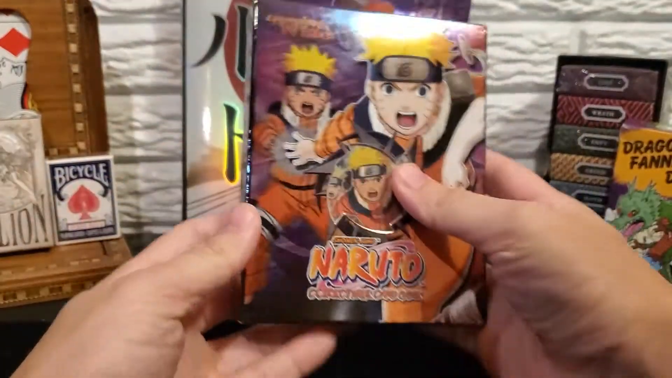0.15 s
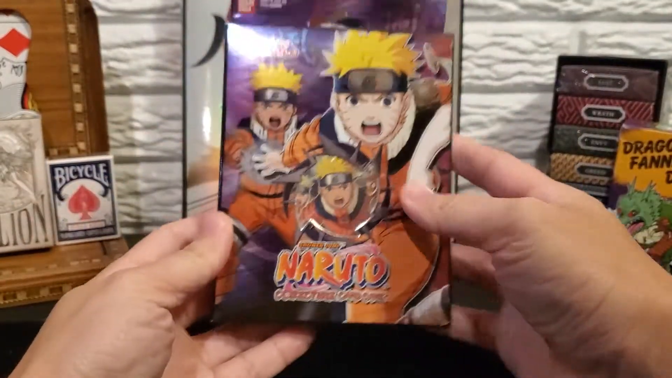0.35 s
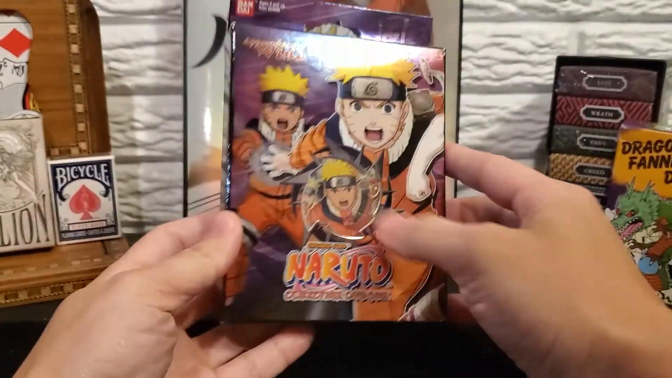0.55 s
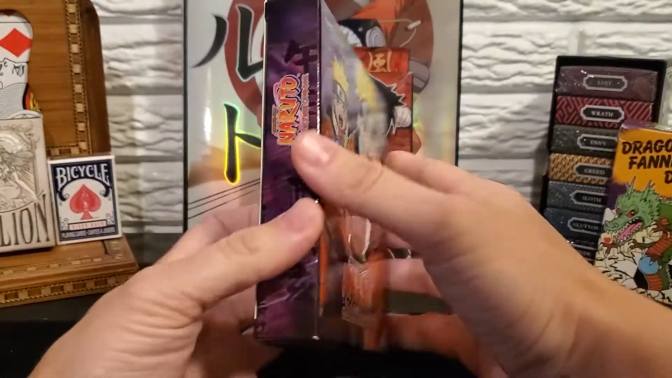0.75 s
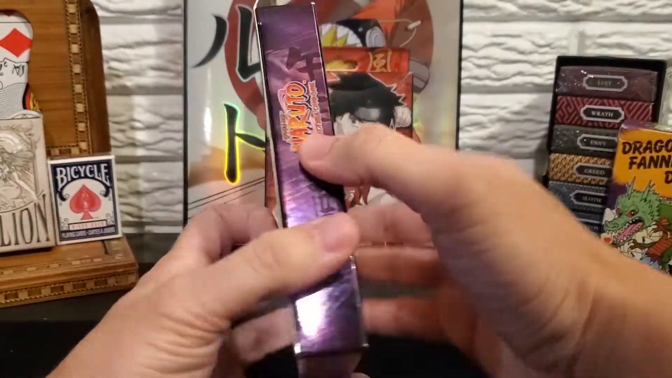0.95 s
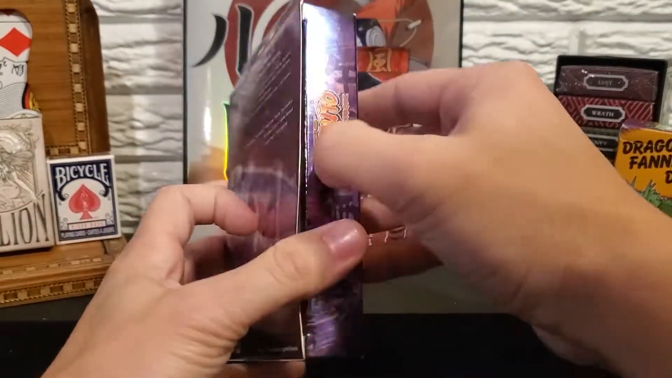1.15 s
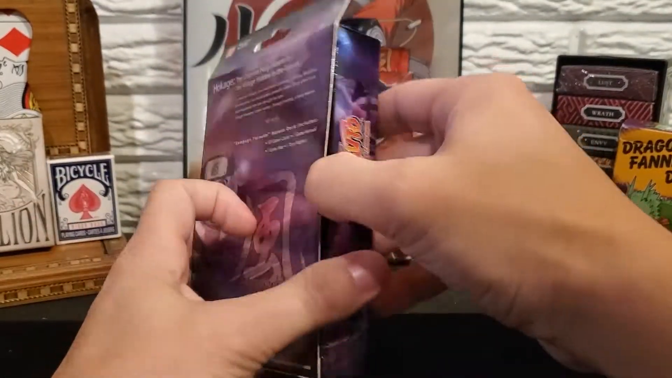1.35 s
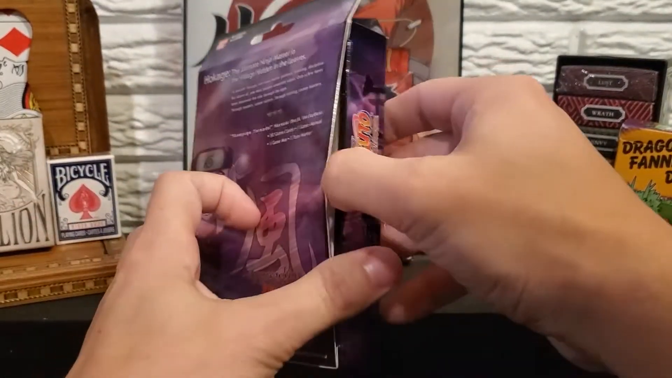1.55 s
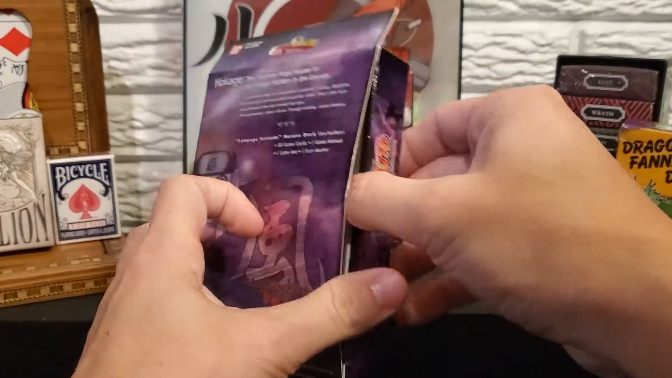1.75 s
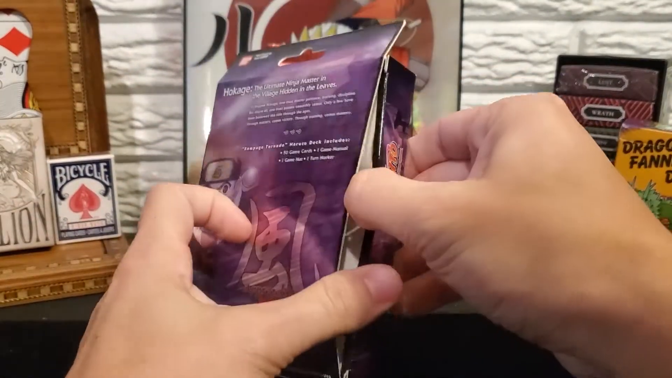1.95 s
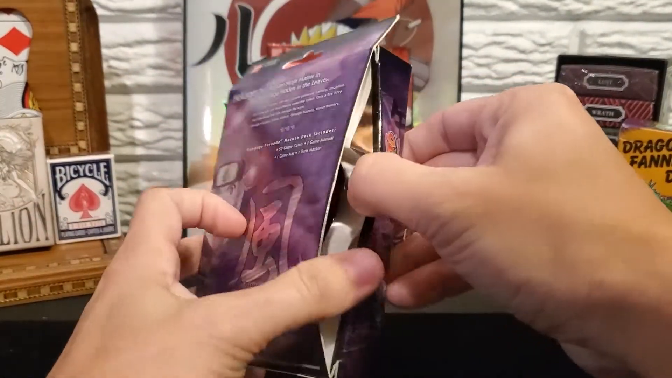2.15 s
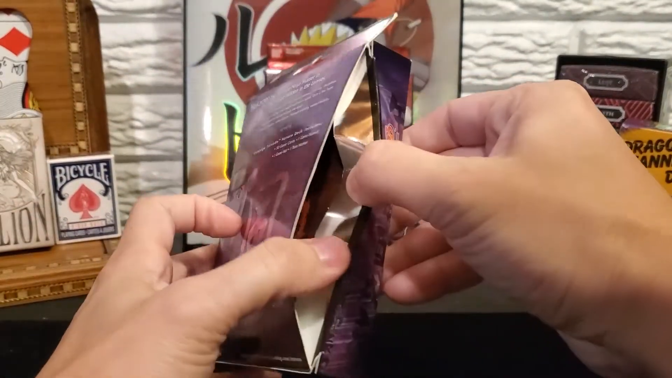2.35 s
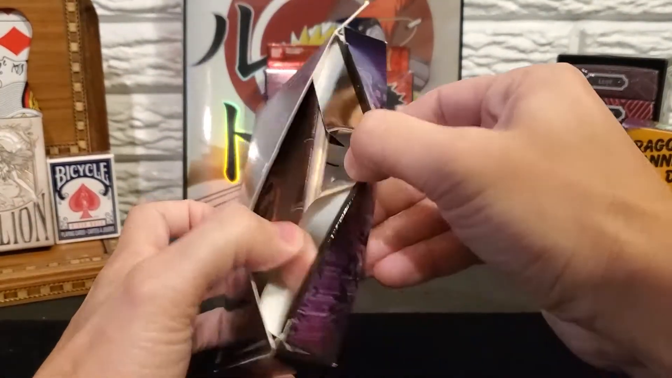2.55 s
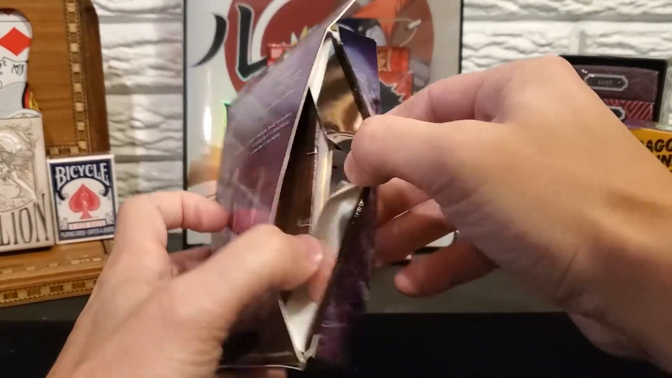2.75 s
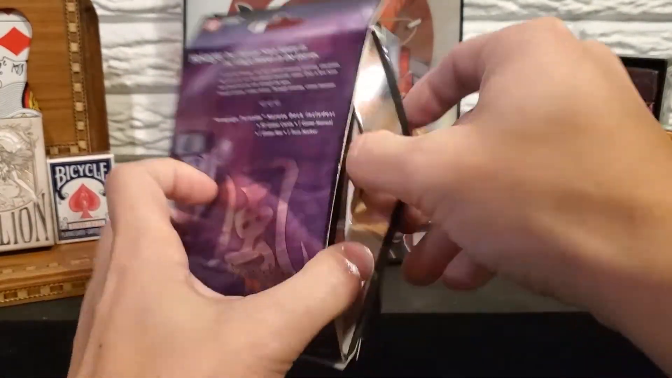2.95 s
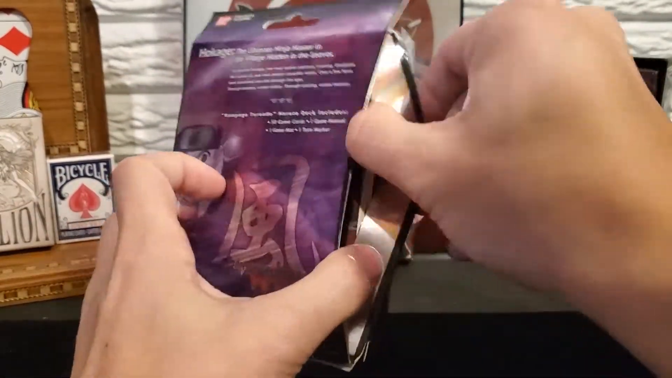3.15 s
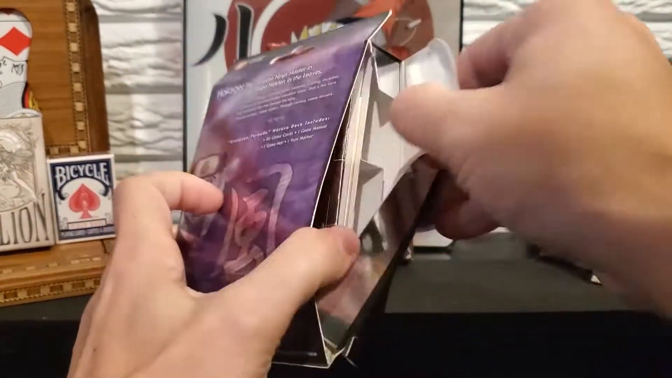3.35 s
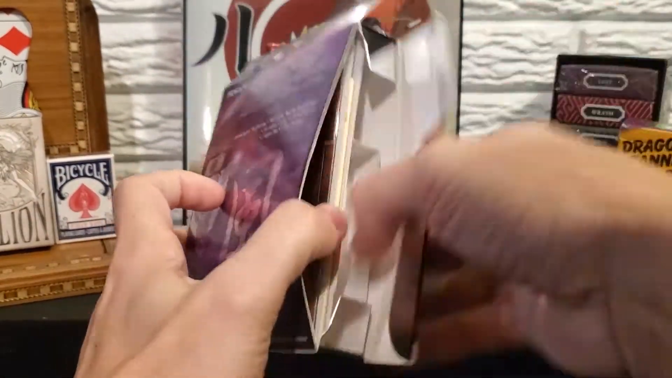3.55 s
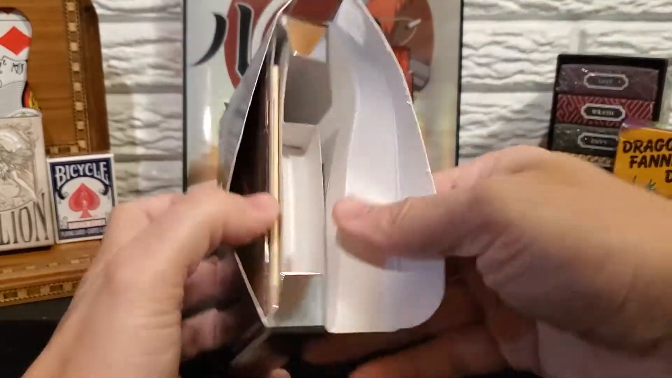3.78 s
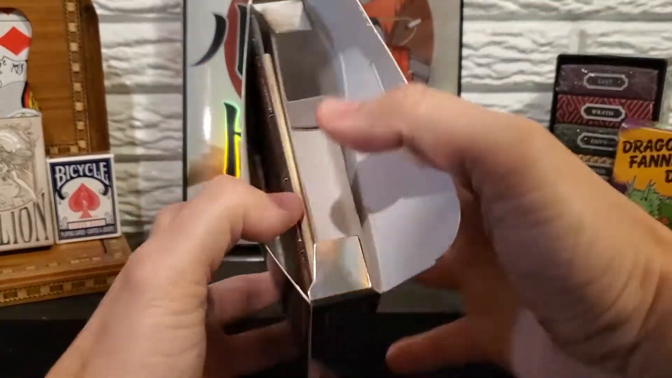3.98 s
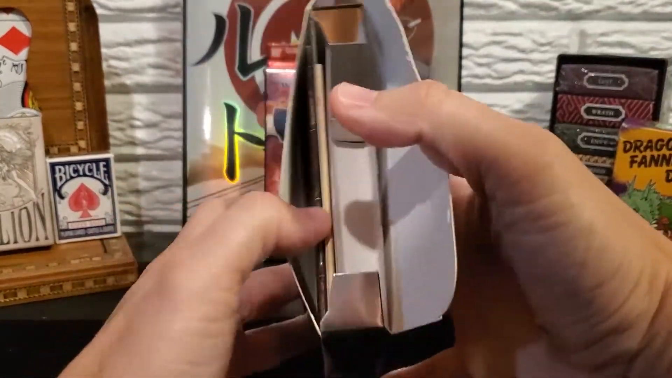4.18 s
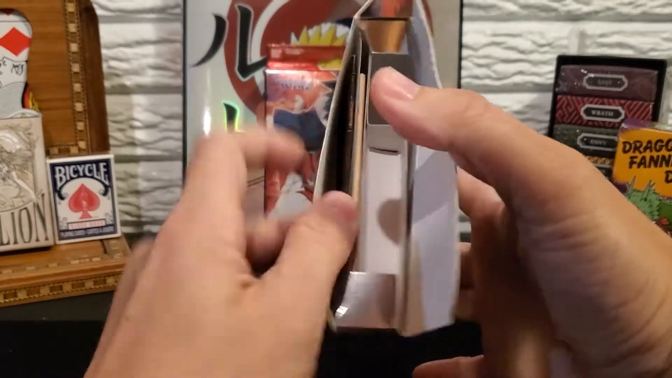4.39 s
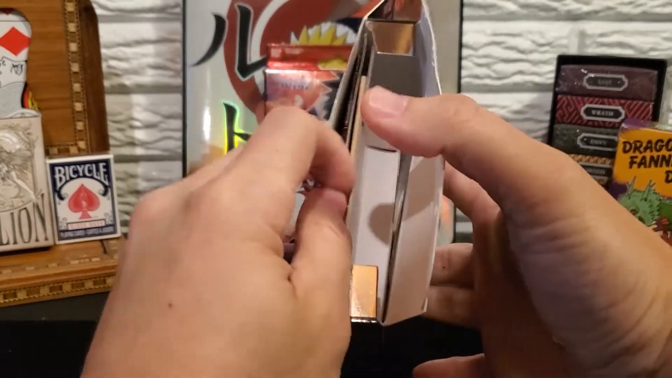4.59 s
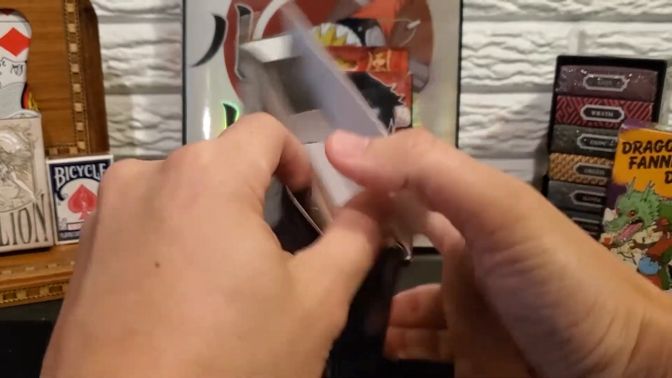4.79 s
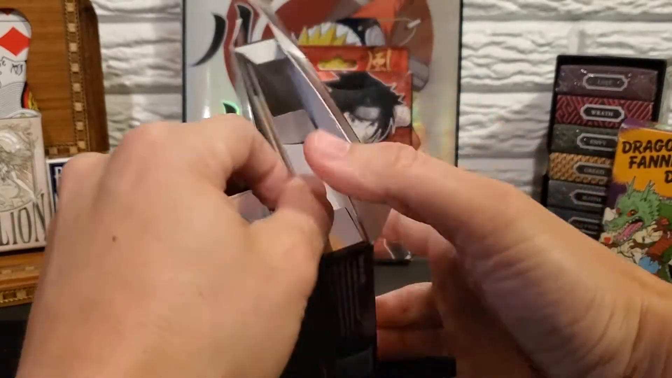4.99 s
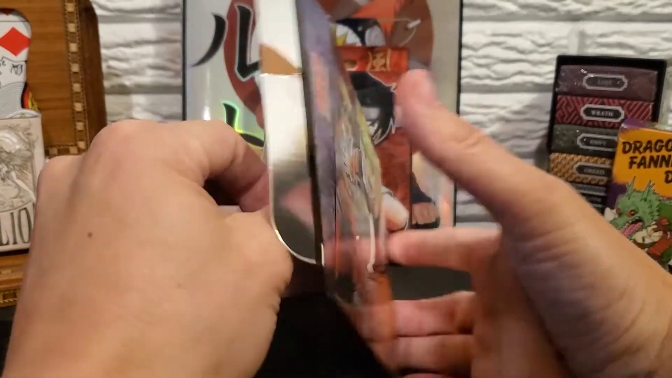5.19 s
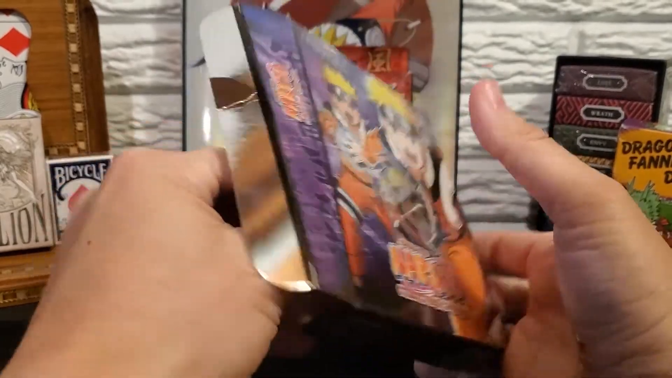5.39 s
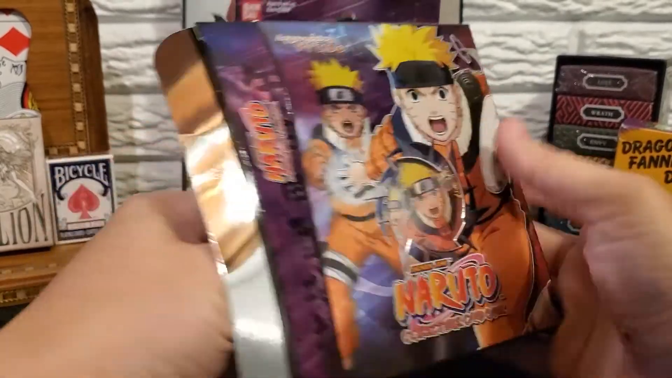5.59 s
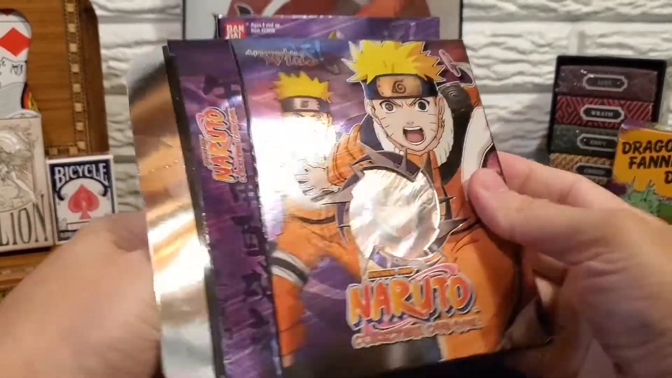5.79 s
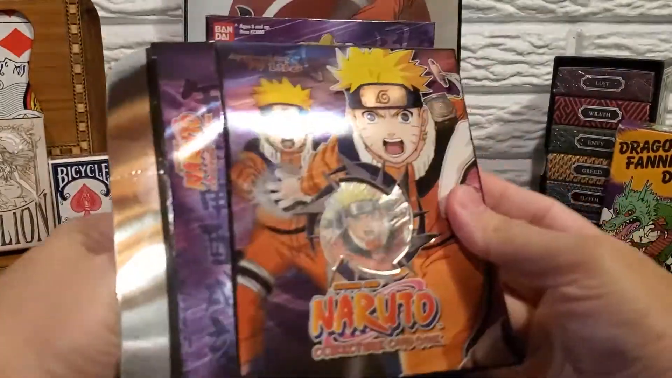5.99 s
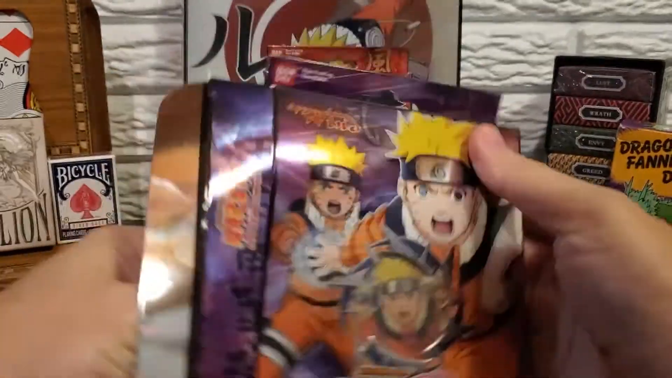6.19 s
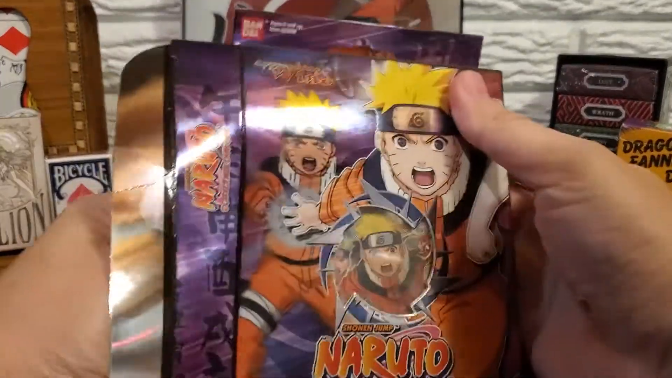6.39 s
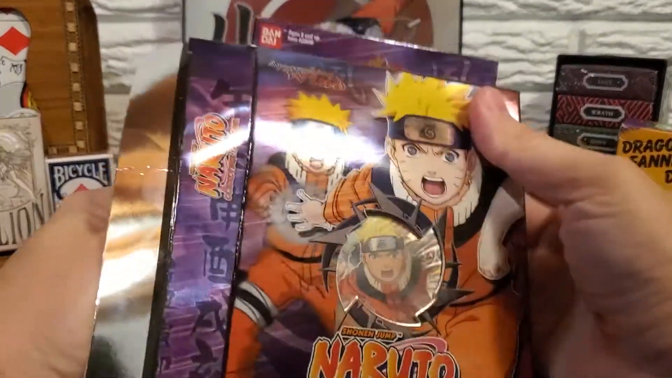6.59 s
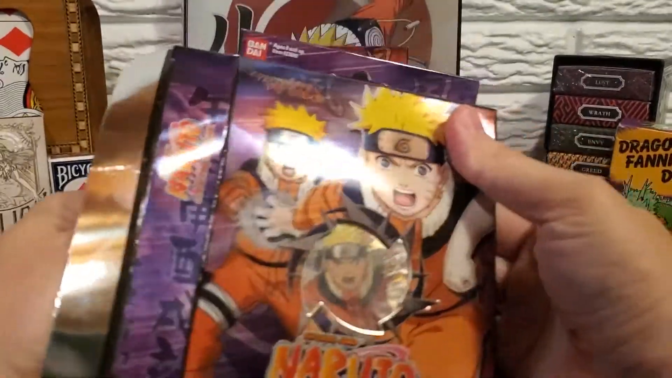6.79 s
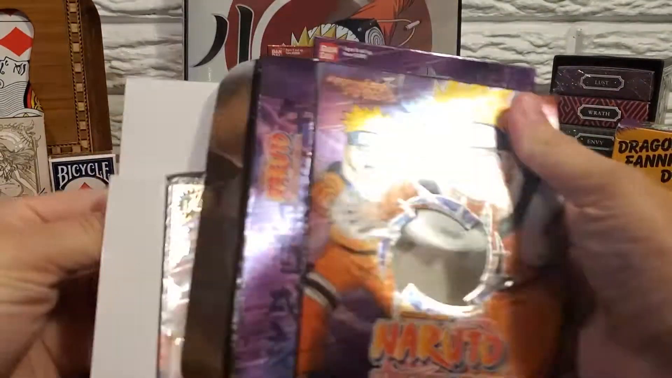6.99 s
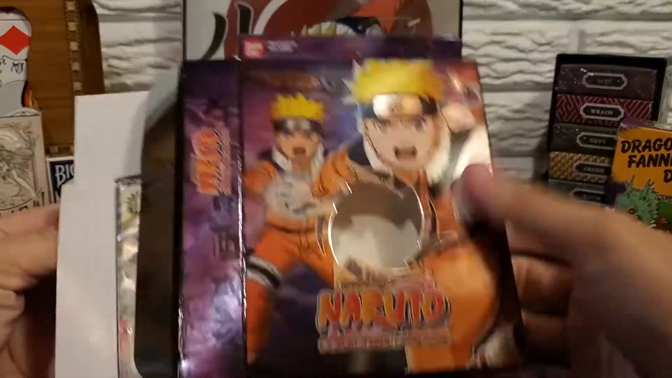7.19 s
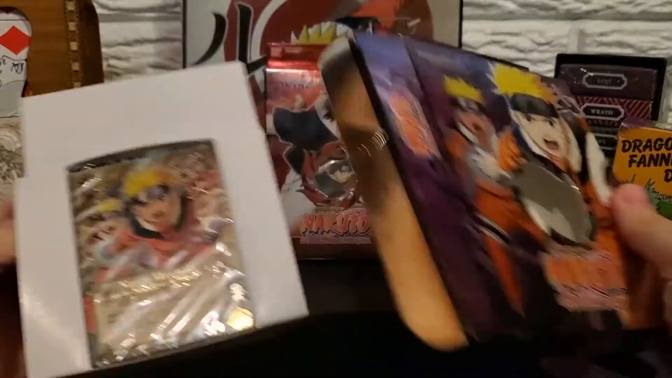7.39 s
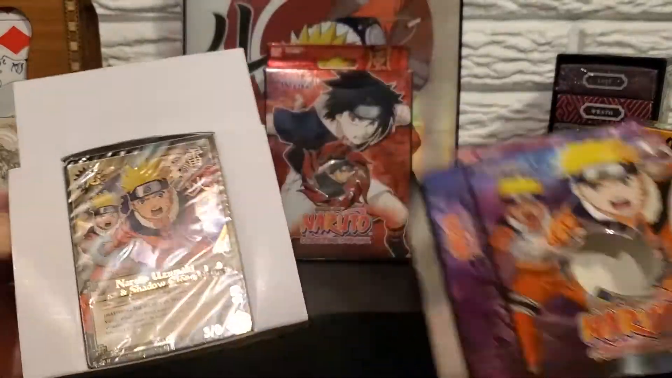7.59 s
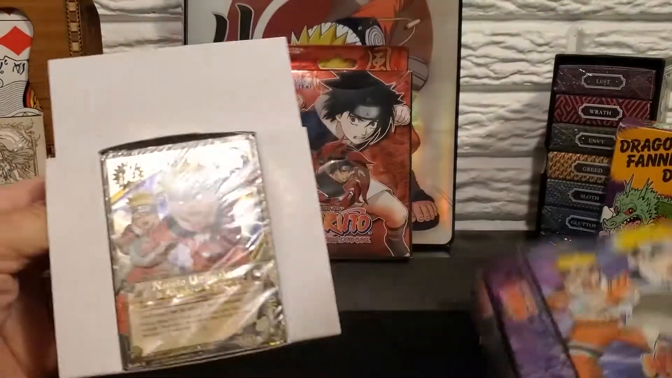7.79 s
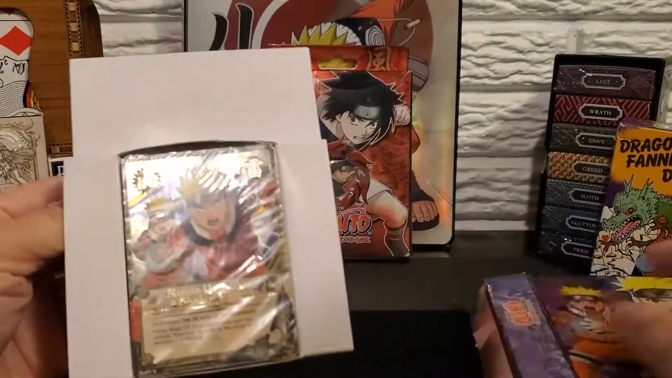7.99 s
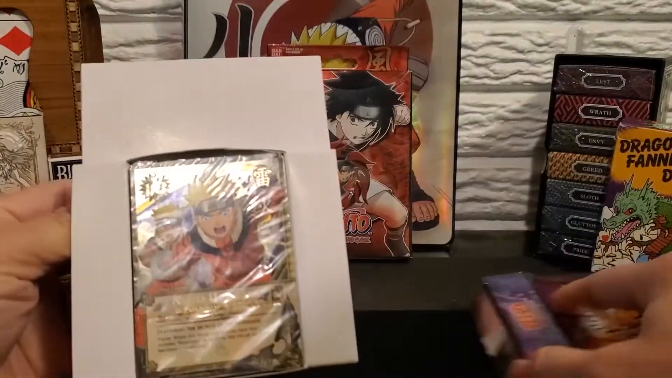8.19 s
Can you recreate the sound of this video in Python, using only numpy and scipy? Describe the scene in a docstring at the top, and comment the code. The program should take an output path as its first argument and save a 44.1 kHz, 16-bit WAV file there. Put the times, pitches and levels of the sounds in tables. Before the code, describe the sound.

Close, dry cardboard handling in a small room: faint rubbing, a burst of loud hollow snaps, lighter fumbling, then a slide and firm knocks.

```python
"""Sharp snaps and hollow knocks, close to a stereo microphone: hands turn a thin glossy card box,
pop its flaps open and slide a tray out. Each snap is a short ragged contact that rings the box modes.
Between them fingers and card edges rub: stick-slip noise rings the card or hisses on the gloss.
A small room answers the box; behind it lie a low rumble, a wavering hum and a dull hush."""
import sys
import numpy as np
from scipy import signal
from scipy.fft import rfft, irfft, next_fast_len
from scipy.io import wavfile
from scipy.ndimage import uniform_filter1d

SR = 44100
rng = np.random.default_rng(int(sys.argv[2]) if len(sys.argv) > 2 else 0)


def pcm_store(signal):
    """Save signal as 16-bit PCM."""
    levels = np.round(np.clip(np.atleast_2d(signal), -1, 1) * 32767)
    wavfile.write(sys.argv[1], SR, levels.astype(np.int16).T)


N = 363384   # length [samples]

# Cavity and panel modes of the box: (frequency [Hz], width before damping [Hz], relative level [dB])
BOX_MODES = [(191, 70, -10), (340, 150, -2), (412, 110, 0), (613, 59, -7.5), (733.7, 50, -2.5),
             (815.5, 51, -0.5), (957, 99, -6.5), (1123, 100, -4), (1420, 150, 6), (1650, 170, 4),
             (1930, 130, 0.5), (2100, 140, 2.5), (2348, 340, 1), (2684, 430, 0), (2970, 480, -2),
             (3490, 310, -2)]
# Colour of dry cracks and of friction on the glossy card: (frequency [Hz], relative density [dB per Hz])
GLOSS_COLOUR = [(1470, -31), (2500, -1.5), (3540, -8), (3850, -12.5), (5530, -16.5), (6600, -18.5),
                (7700, -23.5), (9280, -18.5), (15800, -16.5)]


def snaps():
    """A short ragged contact rings the box from body thump to panel knock, with a dry crack on top."""
    # Flaps and tabs: (time [s], body thump [dB], hollow thud [dB], panel knock [dB], crack [dB],
    # knock pitch [Hz], contact decay [ms])
    snap_rows = [(0.179, -54, -67, -43.5, -59, 1530, 1.6), (0.184, -65, -63, -49, -77, 3400, 4.5),
                 (1.817, -73, -34.5, -44.5, -70, 1480, 7.4), (1.839, -77, -39, -41.5, -59, 1430, 3.8),
                 (2.541, -57, -33, -31, -63, 1600, 3.4), (2.561, -56, -31.5, -43, -64, 1330, 1),
                 (2.775, -72, -50, -45, -58, 1900, 1.9), (2.868, -68, -59, -52, -62, 1500, 1.4),
                 (2.984, -51.5, -59, -41.5, -49.5, 1980, 3.4),
                 (3.157, -44.5, -27.5, -33.5, -28.5, 2150, 1.96),
                 (3.248, -66, -20.5, -14.5, -16, 2480, 1.9), (3.257, -32.5, -27.5, -30, -28, 2440, 1.9),
                 (3.387, -19, -20, -12, -22.5, 2500, 1.15), (3.397, -42, -44, -31, -42, 2930, 1.3),
                 (3.444, -38, -43, -45.5, -37, 2220, 1.3), (3.656, -66, -55, -57, -36.5, 2920, 3.7),
                 (3.671, -56, -51, -36, -42, 2110, 1.4), (3.6, -74, -65, -57, -56, 2180, 1.3),
                 (3.812, -77, -85, -64.5, -60, 3020, 1.7), (3.859, -80, -80.5, -65.5, -62, 2490, 0.72),
                 (3.802, -85, -85, -71, -48, 3020, 1.65), (4.332, -62, -37, -33.5, -36.5, 3320, 5.6),
                 (4.608, -73.5, -70.5, -59.5, -67, 2170, 2.9), (4.616, -70, -60, -49.5, -69.5, 1880, 2.4),
                 (4.641, -73, -51, -53.5, -71, 1490, 3.5), (4.661, -72, -61, -64, -74, 1500, 3),
                 (4.69, -64, -56, -44.5, -56.5, 2270, 1.7), (4.726, -63, -55, -38, -52, 2150, 4),
                 (4.756, -52, -47, -55, -54, 2700, 3.6), (4.734, -47, -47, -32.5, -43.5, 2360, 1.9),
                 (5.023, -60, -74, -37, -61, 3240, 5.2), (5.245, -55, -41, -40.5, -96.5, 1260, 1.48),
                 (5.261, -42, -29, -41, -85, 1210, 1.9), (6.093, -76.5, -56.5, -73, -75, 1540, 1.9),
                 (6.173, -59, -49, -45.5, -46.5, 1520, 3.2), (6.232, -65, -39.5, -55, -46, 1600, 2.2),
                 (6.252, -41.5, -29, -40, -35, 1640, 1.67), (6.867, -28, -34, -44.5, -41, 1523, 1.4),
                 (6.888, -33.5, -34, -32.5, -36, 1600, 5.7), (6.97, -78, -75, -63, -49, 3040, 0.81),
                 (7.075, -61, -51.5, -47.5, -58, 1780, 3.4), (7.188, -78.5, -71.5, -67, -66, 2210, 0.89),
                 (7.314, -45, -29.5, -32.5, -42, 1380, 4.1), (7.349, -54.5, -17.5, -15, -21, 1674, 2.1),
                 (7.853, -39.5, -39.5, -32, -45, 1547, 5.5), (7.87, -27, -32, -32, -43.5, 1730, 0.64),
                 (7.885, -36.5, -24.5, -29, -37.5, 1640, 2), (7.693, -74, -69, -65, -69.5, 1620, 1.9),
                 (8.123, -63.5, -52.5, -67, -75, 1560, 1.37)]
    push = 0.46   # steady shove under the ragged contact, relative to its rattle
    evenness = 0.45   # 0 = ragged contact colours the snap, 1 = it drives all pitches alike
    size = 4096   # samples per snap
    out = np.zeros((2, N + size))
    t = np.arange(size) / SR
    fade_out = np.clip((0.085 - t) / 0.02, 0, 1)
    for s, thump_db, thud_db, knock_db, crack_db, knock_hz, contact_ms in snap_rows:
        time = t * 1000 / np.clip(contact_ms, 0.2, 20)   # in contact decays
        envelope = np.minimum(time / 0.76, 1) ** 0.99 * np.exp(-time)
        contact = (rng.standard_normal((2, size)) + [[push], [0]]) * envelope
        lines = rfft(contact)
        contact = irfft(lines / np.abs(lines) ** evenness, size)
        uneven_db = 2.2 * rng.standard_normal(len(BOX_MODES))
        parts = [(thump_db, box_modes(0, 500, uneven_db, damping=1.0)),
                 (thud_db, box_modes(500, 1100, uneven_db, damping=1.0)),
                 (knock_db, panel_knock(knock_db, knock_hz, uneven_db)),
                 (crack_db, crack)]
        start = round(s * SR)
        for db, gain in parts:
            sound = coloured(contact, gain) * fade_out
            power = uniform_filter1d(sound.mean(axis=0) ** 2, size=SR // 300)
            loudest = np.sqrt(power.max())   # rms of the loudest moment
            out[:, start:start + size] += amp(db) * sound / loudest
    return out[:, :N]


def box_modes(low_hz, high_hz, strength_db, damping):
    """Response of the box modes in a range, each with its strength for this touch."""
    dull_hz = 5000   # card is soft: thump, thud and knock carry little treble

    def gain(f):
        total = 0
        for k, ((hz, width, db), more_db) in enumerate(zip(BOX_MODES, strength_db)):
            if low_hz <= hz < high_hz:
                total = total + amp(db + more_db) * (-1) ** k * mode(f, hz, width * damping)
        return (1 + 1j * f / dull_hz) ** -2 * total
    return gain


def panel_knock(knock_db, knock_hz, uneven_db):
    """Panel modes gathered around the knock pitch; hard knocks shake more panels."""
    spread = 0.35 + 0.07 * max(knock_db + 27, 0)   # resonance width relative to the pitch
    modes = box_modes(1100, 4000, uneven_db, damping=0.95)
    return lambda f: modes(f) * mode(f, knock_hz, spread * knock_hz) ** 2


def crack(f):
    """Dry treble, lagged slightly so it lands together with the ringing knock."""
    dull_hz, lag_s = 9500, 0.0015
    dulling = 1 / np.sqrt(1 + (f / dull_hz) ** 2)
    return band(3600, 17000, GLOSS_COLOUR)(f) * dulling * np.exp(-2j * np.pi * f * lag_s)


def rubbing():
    """Dragged card rings the hollow and the panels; skin on gloss hisses, with a patchy grip."""
    panel_hz, hollow_db, panel_db, slide_db, scuff_db = stroke_controls()
    touch = slips(per_s=900, size_db=4.5)
    scuff = rms_one(patchy(touch, 3700, 6300, patchy_db=-0.5))
    slide = rms_one(patchy(touch, 8100, 15000, patchy_db=6.0))
    grip = drift(20)   # shared by all four layers
    spread = 0.15 + 0.1 * np.maximum(panel_db + 45.5, 0)   # octaves: harder strokes shake more panels
    hollow_gain = amp(hollow_db - 1.0 * drift(30) + 1.6 * grip)
    hollow = hollow_gain * dragging(BOX_MODES[2:7], panel_hz=820, octaves=0.74, damping=1.9)
    panel_gain = amp(panel_db + 1.0 * drift(30) + 0.97 * grip)
    panel = panel_gain * dragging(BOX_MODES[7:], panel_hz, spread, damping=1.9)
    scuff = amp(scuff_db + 2.4 * drift(6.3) + 0.51 * grip) * scuff
    slide = amp(slide_db + 2.0 * drift(28) + 1.4 * grip) * slide
    return hollow + panel + scuff + slide


def stroke_controls():
    """The panel pitch, led by the strongest stroke, and the levels of the four rubbing layers."""
    # Strokes of fingers and card edges: (peak time [s], rise [s], fall [s], drag in the hollow [dB],
    # drag on a panel [dB], panel pitch [Hz], skin sliding on gloss [dB])
    strokes = [(.16, 0.099, 0.12, -84.5, -70, 3300, -68.5), (.19, 0.064, 0.082, -68, -54.5, 2990, -89),
               (0.394, 0.14, 0.049, -66, -60.5, 1240, -74), (.796, 0.25, 0.12, -62.5, -71, 1480, -66.5),
               (.975, 0.19, 0.36, -79.5, -76, 2410, -69), (1.843, 0.036, 0.074, -44.5, -41, 1560, -58),
               (1.98, 0.17, 1, -94, -66, 1580, -82.5), (2.229, 0.082, 0.24, -58.5, -60.5, 1710, -62),
               (2.457, 0.093, 0.28, -55, -51.5, 1570, -54), (2.525, 0.083, 0.045, -61, -44.5, 1670, -84),
               (2.553, 0.037, 0.054, -34, -37.5, 1480, -38.5), (2.674, 0.033, 0.071, -47, -64, 1310, -88),
               (2.744, 0.052, 0.056, -55, -68.5, 3050, -44.5), (2.815, 0.13, 0.12, -55, -54, 2080, -60),
               (3, 0.042, 0.056, -49, -46, 2170, -54.5), (3.17, 0.022, 0.088, -39.5, -36.5, 2750, -48),
               (3.232, 0.056, 0.022, -56, -38, 2400, -37), (3.253, 0.13, 0.12, -46, -29, 2870, -48.5),
               (3.398, 0.04, 0.019, -38, -30.5, 2530, -79), (3.514, 0.096, 0.039, -44.5, -37, 1880, -42),
               (3.58, 0.47, 0.13, -68, -52, 2160, -49.5), (3.674, 0.057, 0.041, -38, -36, 2230, -44),
               (3.76, 0.13, 0.14, -84.5, -54.5, 2600, -63), (3.825, 0.12, 0.04, -84.5, -61.5, 2940, -54.5),
               (3.895, .04, 0.077, -79, -76, 3000, -52.5), (4.02, 0.054, 0.064, -81.5, -63, 3350, -56),
               (4.074, 0.047, 0.1, -65.5, -54.5, 1820, -57), (4.35, 0.034, 0.069, -59, -40.5, 1923, -41.5),
               (4.416, 0.22, 0.037, -81, -53, 3000, -52), (4.624, 0.081, 0.21, -60, -62.5, 2010, -62.5),
               (4.742, 0.049, 0.082, -48.5, -35.5, 2350, -45), (4.801, 0.11, 0.083, -65, -49, 3400, -50),
               (4.966, 0.036, 0.18, -82, -66, 3350, -61.5), (5.026, 0.027, 0.025, -67, -46, 3040, -41.5),
               (5.05, 0.069, 0.22, -60, -50.5, 2910, -67), (5.17, 0.042, 0.15, -66, -57.5, 3130, -67),
               (5.28, 0.07, 0.12, -42.5, -51, 1810, -47), (5.32, 0.066, 0.24, -58, -54.5, 3160, -63),
               (5.458, 0.33, 0.16, -67, -64, 3410, -54.5), (5.61, 0.05, 0.23, -66, -64, 1600, -65.5),
               (5.744, 0.074, 0.067, -58.5, -57, 2680, -58.5),
               (6.155, 0.053, 0.099, -42.5, -42.5, 2900, -43.5), (6.23, 0.11, 0.046, -47, -45.5, 1700, -61),
               (6.265, 0.062, 0.087, -59, -46.5, 1730, -45), (6.335, 0.1, 0.053, -42, -44, 3260, -47),
               (6.423, 0.065, 0.11, -65, -67, 3330, -52.5), (6.553, 0.034, 0.051, -53, -59.5, 2000, -60),
               (6.621, 0.053, 0.086, -65.5, -45, 1880, -73.5), (6.825, 0.03, 0.17, -67.5, -41, 2130, -39),
               (6.872, 0.055, 0.07, -35, -25.5, 1690, -32), (6.97, 0.011, 0.2, -74, -74, 1610, -52),
               (7.008, 0.06, 0.097, -59, -43, 1800, -57.5), (7.208, 0.023, 0.12, -57, -73.5, 3070, -55.5),
               (7.341, 0.068, 0.038, -37, -34, 1800, -34), (7.363, 0.068, 0.0065, -30.5, -25.5, 2060, -51),
               (7.684, 0.35, 0.35, -73, -76, 1612, -74), (7.794, 0.062, 0.16, -67.5, -63.5, 1473, -60.5),
               (7.899, 0.072, 0.041, -32.5, -41, 1680, -61), (8.134, 0.088, 0.054, -59, -66, 1680, -73),
               (8.24, 0.081, 0.075, -62.5, -63.5, 1354, -58.5)]
    # Hands at rest, one value per layer: (hollow [dB], panel [dB], slide [dB], scuff [dB])
    holding_db = [-85, -86.5, -96, -85.5]
    hollow, panel, panel_hz, slide = np.array(strokes)[:, 3:].T
    scuff = -9 + 0.49 * panel + 0.51 * slide   # scuff follows both panel drag and skin slide
    weight = swells(strokes, panel, holding_db[1]) ** 2
    touched_hz = full_rate(np.exp(np.log(panel_hz) @ weight / weight.sum(axis=0)))
    layers = zip([hollow, panel, slide, scuff], holding_db)
    return touched_hz, *[level_db(strokes, db, rest_db) for db, rest_db in layers]


def slips(per_s, size_db):
    """Stick-slip: dense uneven grains, their rate wandering around per_s, over fine friction noise."""
    sizes = amp(size_db * np.minimum(rng.exponential(1, (2, N)), 3.2))
    born = rng.random(N) < per_s * amp(4 * drift(15)) / SR
    return rng.standard_normal((2, N)) * (1 + sizes * born)


def dragging(modes, panel_hz, octaves, damping):
    """Slips ring the modes around the part being dragged, at near-steady loudness."""
    grains = coloured(slips(per_s=360, size_db=6.5), np.ones_like)
    out, power = 0, 0
    for k, (hz, width, db) in enumerate(modes):
        r = np.exp(-np.pi * damping * width / SR)
        resonance = [1, -2 * r * np.cos(2 * np.pi * hz / SR), r * r]
        rung = signal.lfilter([1, 0, -1], resonance, grains)
        gain = amp(db + np.maximum(nearness_db(hz, panel_hz, octaves), -18))
        out = out + (-1) ** k * gain * rms_one(rung)
        power = power + gain ** 2
    return out / np.sqrt(power)


def nearness_db(hz, centre_hz, octaves):
    """Modes far in pitch from the touched panel are excited less."""
    return -6 * (np.log2(hz / centre_hz) / octaves) ** 2


def patchy(touch, low_hz, high_hz, patchy_db):
    """Friction hiss in three strips whose strengths wander apart as the contact shifts."""
    edges = np.geomspace(low_hz, high_hz, 4)
    out = 0
    for low, high in zip(edges, edges[1:]):
        strip = coloured(touch, band(low, high, GLOSS_COLOUR))
        out = out + amp(patchy_db * drift(6)) * strip
    return out


def room(x):
    """Dense reflections: a dull tail, and bright ones off the table and the near wall."""
    room_t60_s, room_db = 0.14, -14.5
    wall_t60_s, wall_db = 0.16, -12
    t = np.arange(SR // 2) / SR
    dull, bright = [coloured(rng.standard_normal((2, len(t))), np.ones_like) for _ in range(2)]
    dull = signal.lfilter([0.3], [1, -0.7], dull)
    # the wall returns little bass
    bright = signal.lfilter(*signal.butter(1, 1300, "high", fs=SR), bright)
    # the square root brings each decay to about unit energy before its level
    tail = amp(room_db - 60 * t / room_t60_s) * rms_one(dull) * np.sqrt(14 / room_t60_s / SR)
    near = amp(wall_db - 60 * t / wall_t60_s) * rms_one(bright) * np.sqrt(14 / wall_t60_s / SR)
    return signal.oaconvolve(x, (tail + near) * (t > 0.002), axes=1)[:, :N]


def room_tone():
    """Filtered noise: low rumble and a wavering hum swell now and then over a steady dull hush."""
    # Colour of rumble and hush: (frequency [Hz], relative density [dB per Hz])
    tone_colour = [(15, -50.5), (25, -42), (43, -21), (54, -9.5), (71, -2.5), (90, -4.5), (121, -17),
                   (156, -18), (276, -24.5), (407, -25), (488, -25.5), (584, -36), (1060, -36.5),
                   (1170, -39), (2240, -45), (12000, -89), (15600, -110), (22000, -120)]
    # Left-right likeness of the room tone: (frequency [Hz], likeness [0 to 1])
    tone_likeness = [(60, 1), (300, 0.82), (1000, 0.083), (4000, 0.13)]
    # Swells: (peak time [s], rise [s], fall [s], low rumble [dB], hum [dB])
    swell_rows = [(2.08, 0.13, 0.3, -40, -38.5), (2.349, 0.076, 0.046, -47, -38),
                  (2.52, 0.18, 0.19, -39, -83), (6.45, 0.56, 0.63, -45, -54.5), (6.85, 0.38, 0.2, -43, -74),
                  (7.8, 0.37, 0.9, -48, -65.5)]
    rumble_rest_db, hum_rest_db, hush_db = -50, -59, -61.5
    rumble_db, hum_db = np.array(swell_rows)[:, 3:].T
    layers = [(level_db(swell_rows, rumble_db, rumble_rest_db), band(20, 160, tone_colour)),
              (level_db(swell_rows, hum_db, hum_rest_db), lambda f: mode(f, 149.26, 9.7) ** 2),
              (hush_db, band(200, 17000, tone_colour))]
    out = 0
    for db, gain in layers:
        noise = coloured(rng.standard_normal((2, N)), gain, tone_likeness)
        out = out + amp(db) * rms_one(noise)
    return out


def swells(rows, levels_db, rest_db):
    """Power of each row at every 32nd sample: rise and fall in dB, over a share of the rest level."""
    swing_db = 25   # gained over the rise, lost over the fall
    roundness = 1.3   # 1 = pointed peak, more = flatter top and steeper ends
    s, rise, fall = np.array(rows)[:, :3].T[:, :, None]
    t = np.arange(0, N + 32, 32) / SR
    before, after = (s - t) / np.maximum(rise, 0.005), (t - s) / np.maximum(fall, 0.005)
    shape_db = -swing_db * np.maximum(before, after) ** roundness
    return amp(2 * (shape_db + np.array(levels_db)[:, None])) + amp(2 * rest_db) / len(rows)


def full_rate(x):
    """From every 32nd sample to every sample."""
    return np.interp(np.arange(N) / 32, np.arange(len(x)), x)


def level_db(rows, levels_db, rest_db):
    """Summed level of overlapping rows."""
    return full_rate(10 * np.log10(swells(rows, levels_db, rest_db).sum(axis=0)))


def mode(f, hz, width):
    """Causal response of one resonance, gain 1 on top."""
    return 1j * f * width / (hz ** 2 - f ** 2 + 1j * f * width)


def band(low_hz, high_hz, spectrum):
    """Gain of one stretch of a spectrum with steep skirts."""
    def gain(hz):
        skirts = np.sqrt((1 + (low_hz / hz) ** 8) * (1 + (hz / high_hz) ** 8))
        return amp(at_hz(spectrum, hz)) / skirts
    return gain


def coloured(pair, gain, likeness=None):
    """Two unrelated signals become left and right, more or less alike by pitch, coloured by gain(Hz)."""
    # Left-right likeness close to the microphone: (frequency [Hz], likeness [0 to 1])
    close_likeness = [(300, 0.94), (1000, 0.33), (3000, 0.32), (8000, 0.15)]
    if likeness is None:
        likeness = close_likeness
    size = next_fast_len(pair.shape[1], True)
    hz = np.maximum(np.fft.rfftfreq(size, 1 / SR), 10)
    alike = np.clip(at_hz(likeness, hz), 0, 1)
    mid, side = rfft(pair, size) * gain(hz)
    mid, side = np.sqrt(1 + alike) * mid, np.sqrt(1 - alike) * side
    return irfft(np.array([mid + side, mid - side]), size)[:, :pair.shape[1]]


def at_hz(points, hz):
    """Read a spectrum on a log-frequency axis."""
    point_hz, values = np.transpose(points)
    return np.interp(np.log(hz), np.log(point_hz), values)


def drift(rate):
    """Slow random wander of unit rms: noise through two equal low-pass poles at rate [Hz]."""
    r = np.exp(-80 * np.pi * rate / SR)   # one step is 40 samples
    noise = rng.standard_normal(N // 40 + 2002)
    slow = signal.lfilter([1], [1, -2 * r, r * r], noise)[2000:]   # start-up dropped
    return np.interp(np.arange(N) / 40, np.arange(len(slow)), rms_one(slow))


def amp(db):
    """dB to gain."""
    return 10 ** (np.asarray(db) / 20)


def rms_one(x):
    """Scale to unit rms."""
    return x / np.sqrt(np.mean(x ** 2) + 1e-20)


def scene():
    """The box in the hands left of centre, its room, and the room tone behind."""
    # Place of the box, left of centre, less so once set down: (time [s], left-right level [dB])
    place = [(7.5, 3.5), (7.8, 1.5)]
    place_s, place_db = np.transpose(place)
    left_db = np.interp(np.arange(N) / SR, place_s, place_db)
    box = amp([left_db / 2, -left_db / 2]) * (snaps() + rubbing())
    box[1] = np.roll(box[1], 2)   # the right microphone hears the box 2 samples later
    return box + room(box) + room_tone()


def record(dry):
    """Soft limiting keeps the loudest peaks within range, and a steep filter cuts the top."""
    ceiling, cutoff_hz = 0.95, 16700
    rounded = dry / (1 + (dry / ceiling) ** 4) ** 0.25
    return signal.sosfilt(signal.cheby2(12, 70, cutoff_hz, fs=SR, output="sos"), rounded)


dry = scene()
out = record(dry)
pcm_store(out)
```